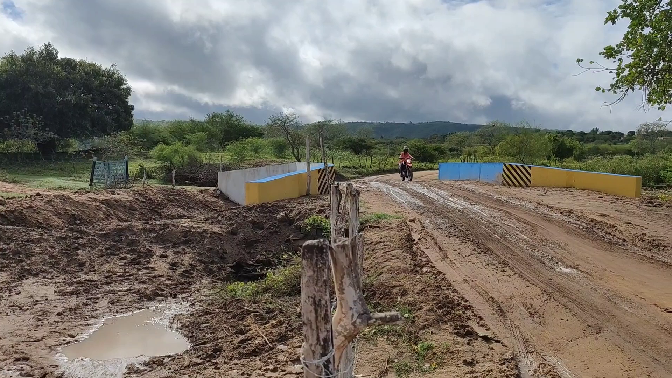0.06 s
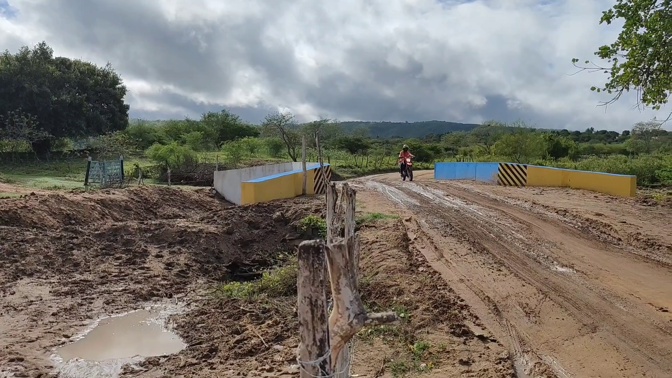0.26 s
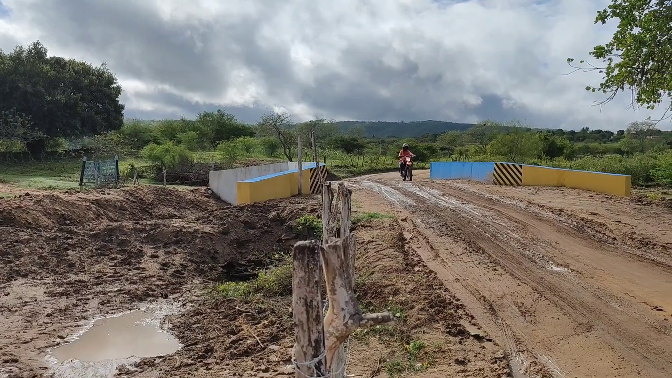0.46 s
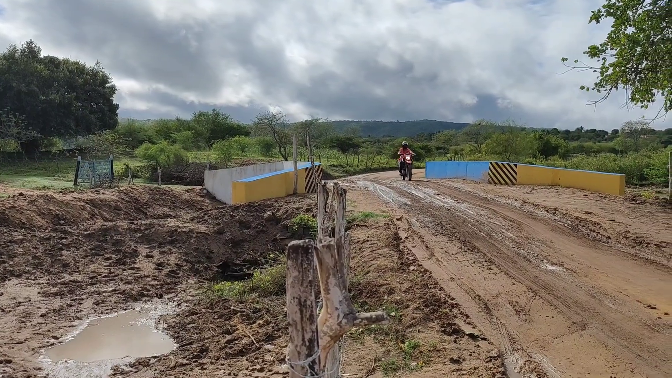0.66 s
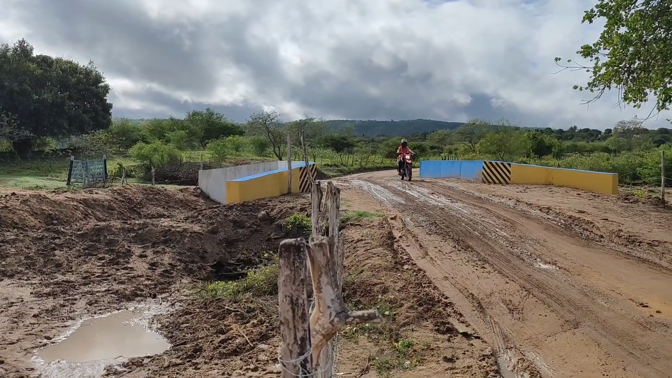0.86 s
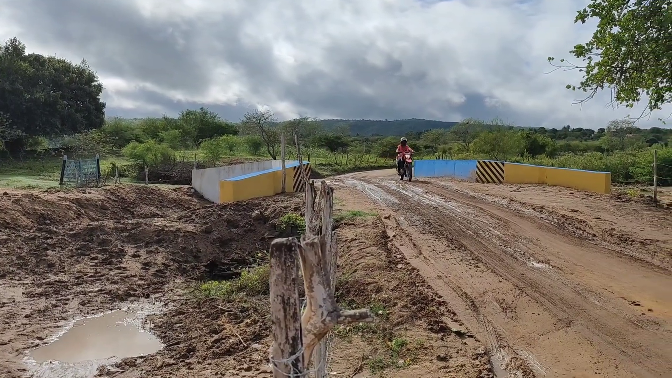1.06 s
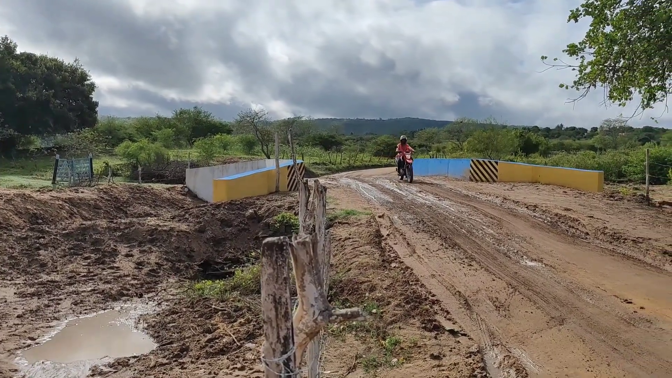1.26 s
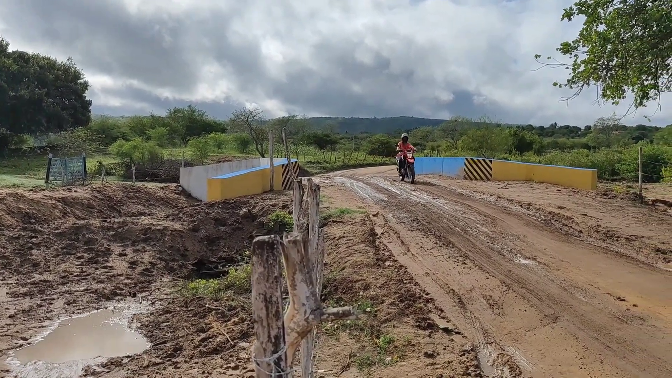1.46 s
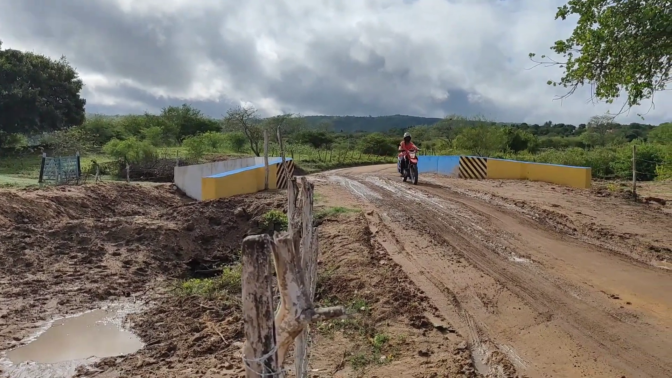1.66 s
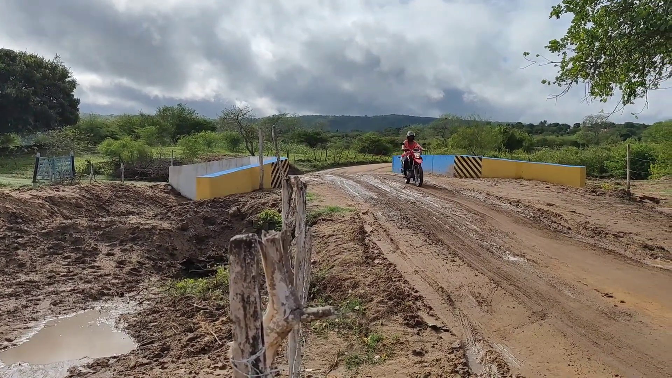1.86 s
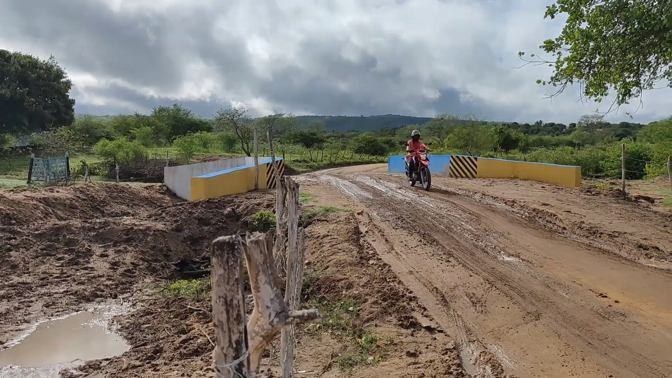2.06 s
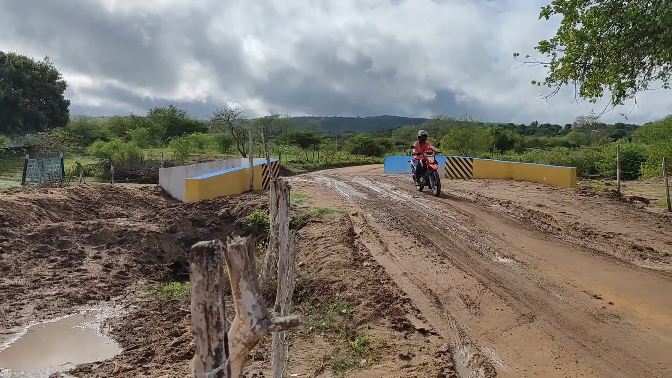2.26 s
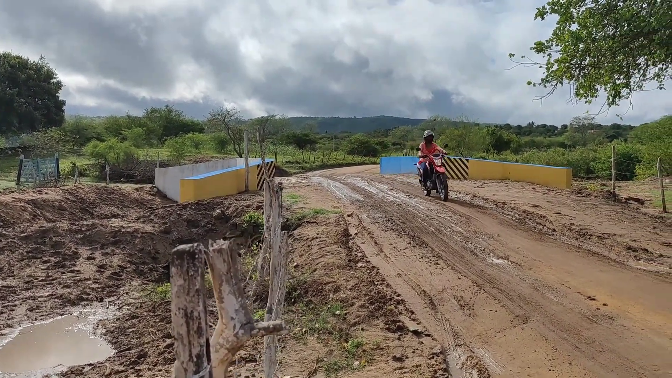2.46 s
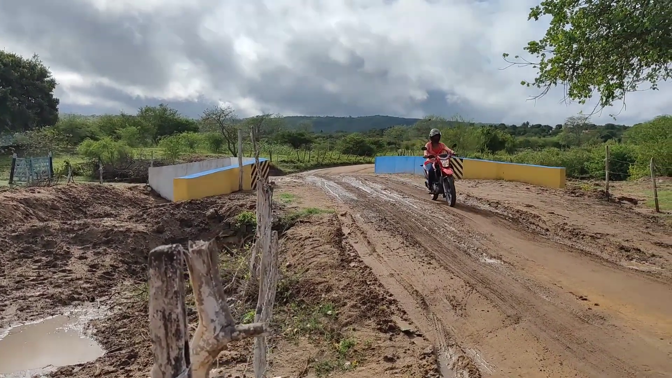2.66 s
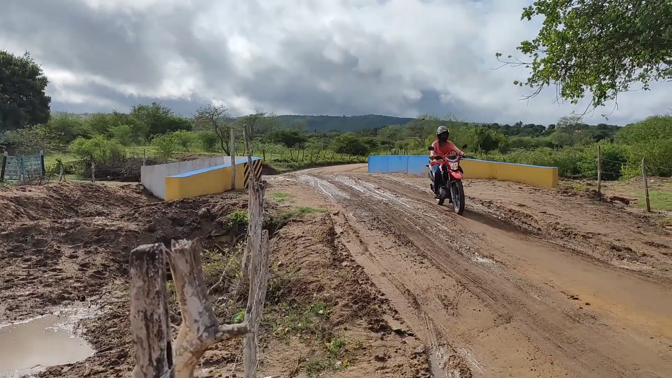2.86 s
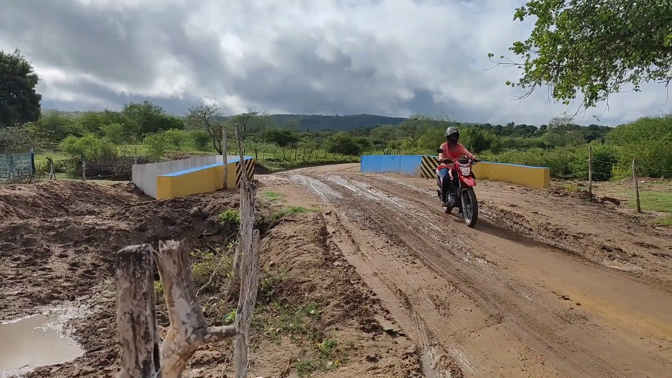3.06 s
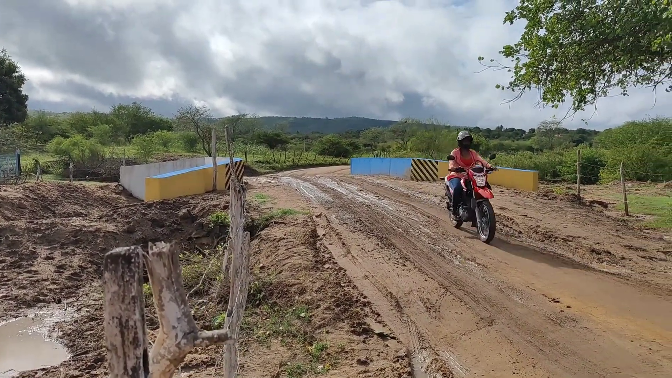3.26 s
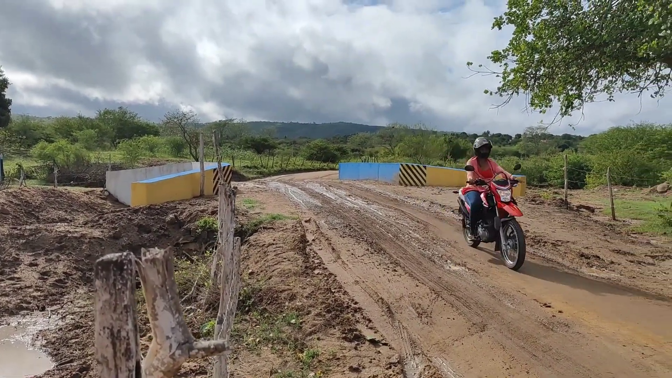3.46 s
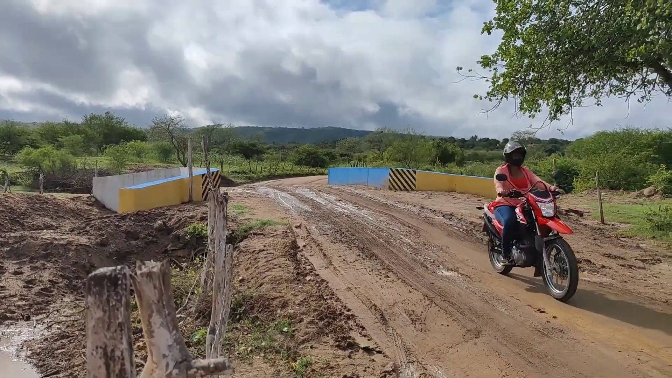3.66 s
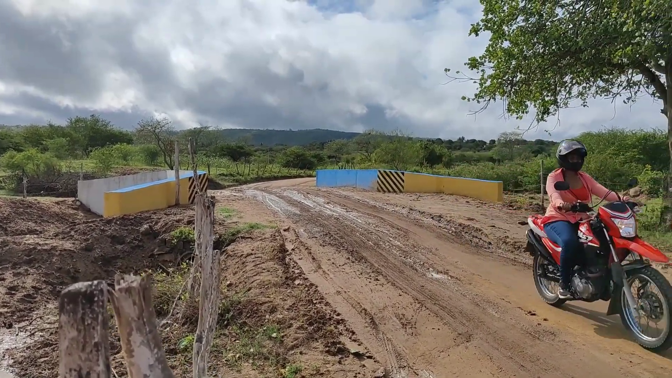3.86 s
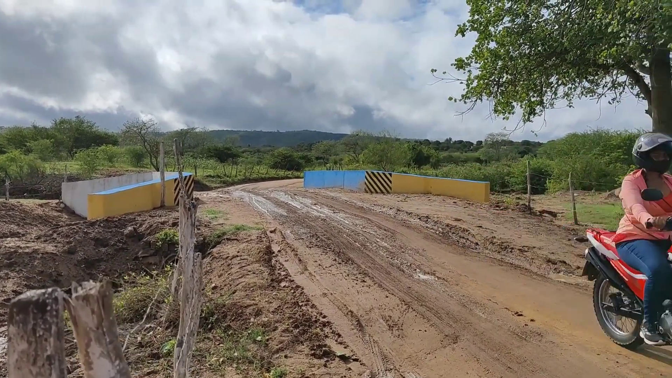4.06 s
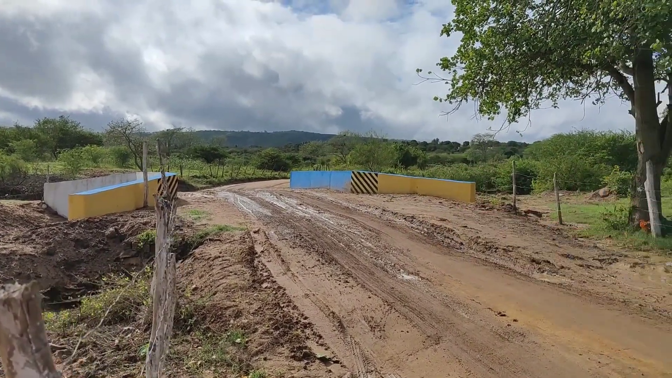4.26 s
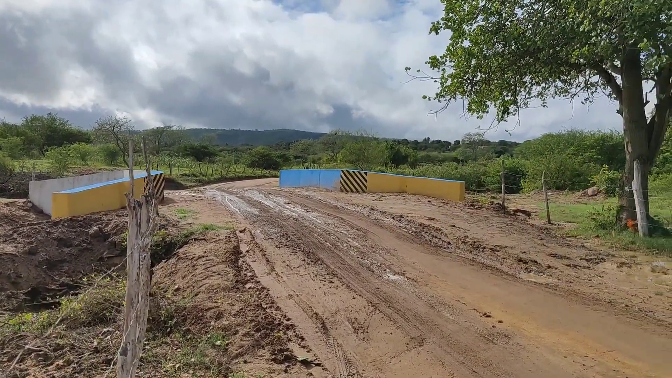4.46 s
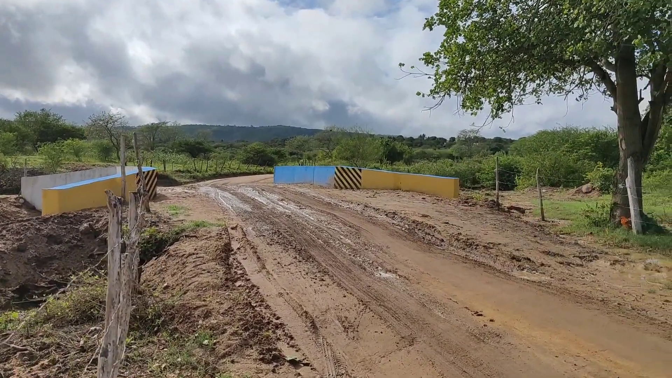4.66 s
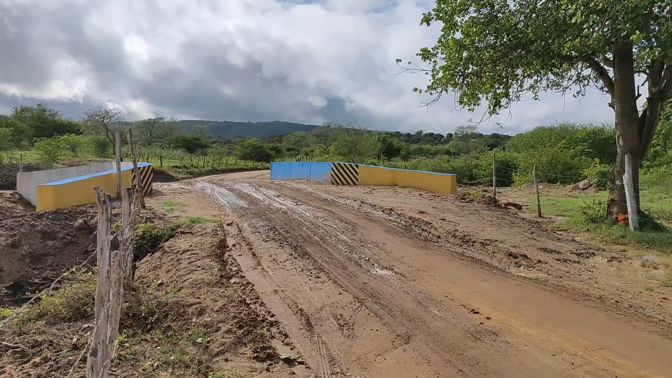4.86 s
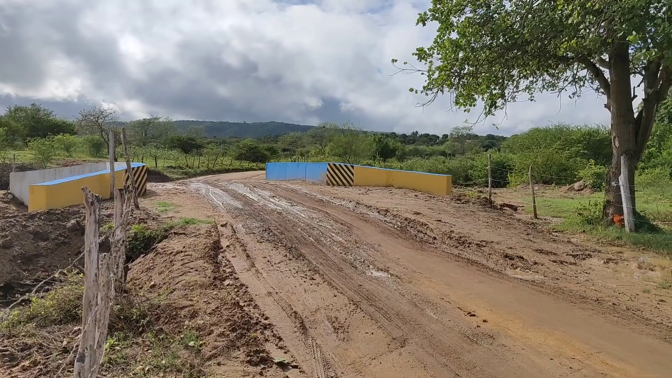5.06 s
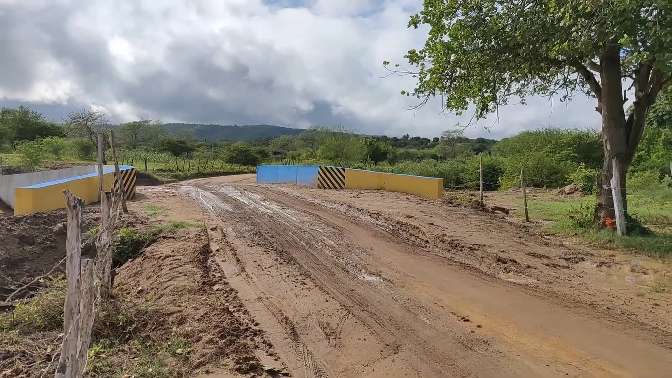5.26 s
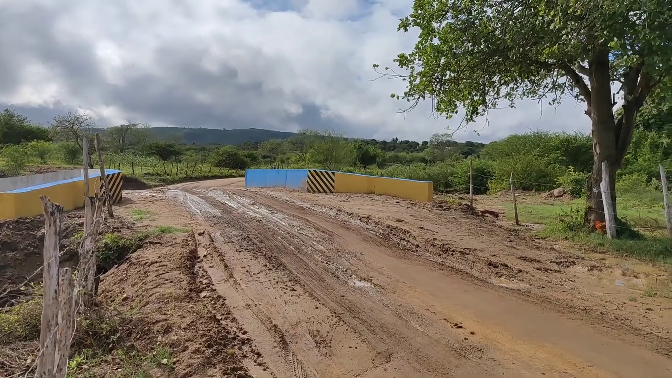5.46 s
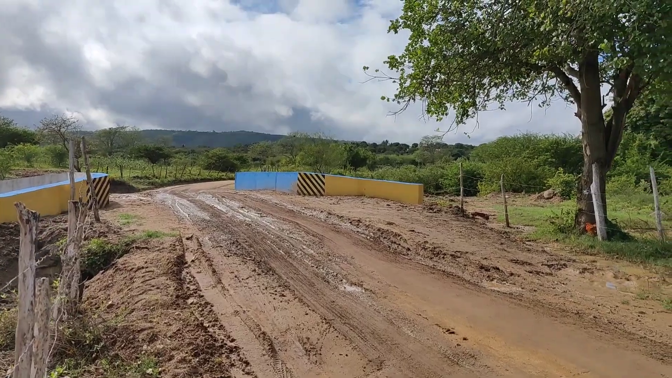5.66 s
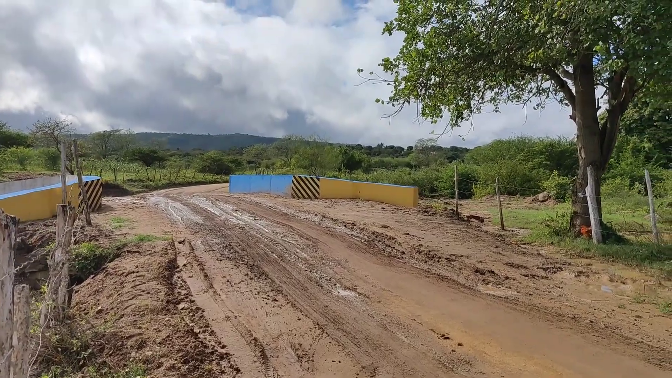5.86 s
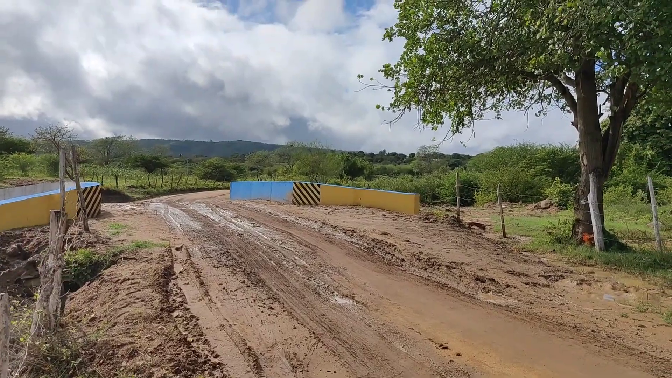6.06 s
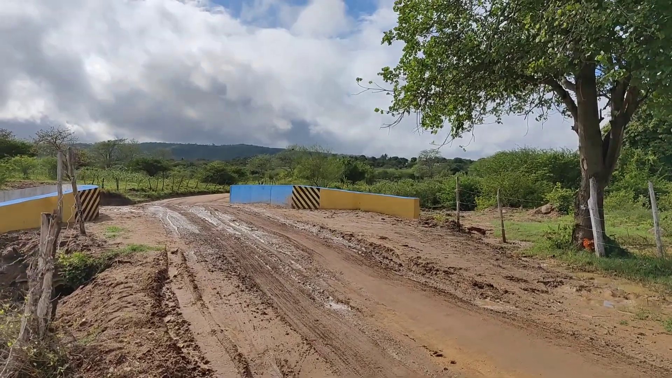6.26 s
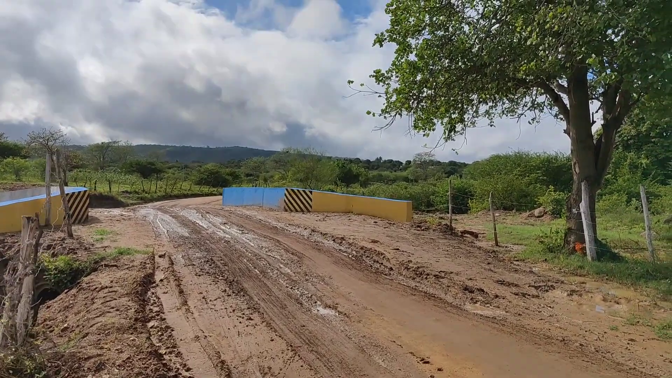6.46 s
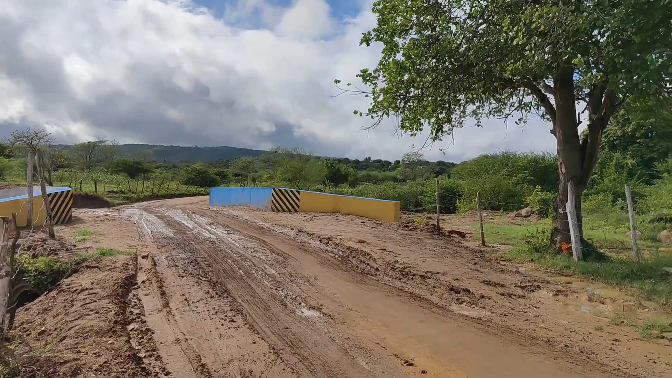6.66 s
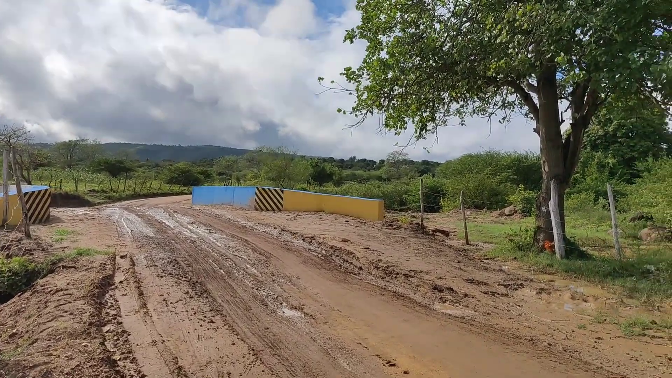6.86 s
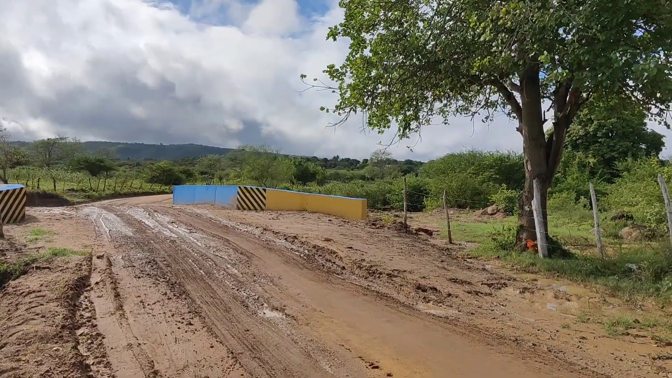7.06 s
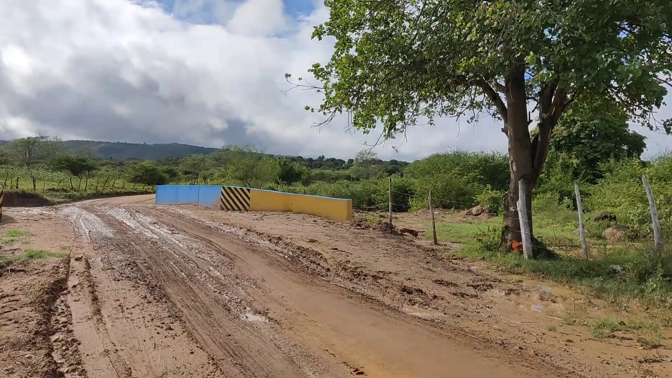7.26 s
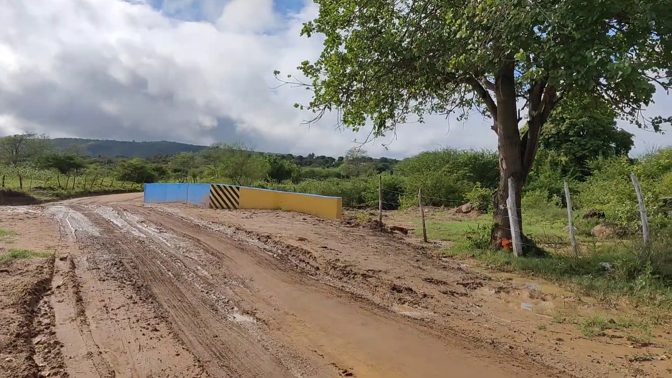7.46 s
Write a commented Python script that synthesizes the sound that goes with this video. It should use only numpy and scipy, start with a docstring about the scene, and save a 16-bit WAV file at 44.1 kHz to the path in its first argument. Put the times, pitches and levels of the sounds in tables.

```python
"""A small four-stroke single rides up a muddy road, eases off before a bump, passes a few metres away and pulls off.
Each firing thumps and rasps in the exhaust; the drive whines, the engine clatters, the tyres spray wet grit.
Most parts follow distance, side shown and throttle; the ground echo sweeps as the bike goes by.
Ruts knock, the suspension squeaks faintly, and wind buffets the two microphone ports near the end."""
import sys
import numpy as np
from scipy import signal
from scipy.fft import rfft, irfft, next_fast_len
from scipy.io import wavfile
from scipy.ndimage import uniform_filter1d, map_coordinates

SR = 44100
rng = np.random.default_rng(int(sys.argv[2]) if len(sys.argv) > 2 else 0)


def to_wav(sig):
    """Store sig (one row per channel, or 1-D mono) as 16-bit WAV at the path in sys.argv[1].

    Samples outside -1..1 are clipped; the rate is SR.
    """
    pcm = np.clip(np.atleast_2d(sig), -1, 1) * 32767
    pcm = np.round(pcm).astype(np.int16)
    wavfile.write(sys.argv[1], SR, pcm.T)  # frames by channels


N = 331411
T = np.arange(N) / SR  # s
# straight ride at steady speed; PASS_S: engine level with the listener
SPEED_M_S, NEAREST_M, PASS_S = 7.19, 2.78, 4.544
# Throughout: cycles = running count of engine cycles (one firing each), cycle_hz = its rate,
# rear = share of sound from the back of the bike. Spectrum levels are relative.


def engine_voice(cycles, cycle_hz, rear, throttle):
    """Low and middle sound: whine beams forward, outlet back and aside, distance smears thump into rumble."""
    # rumble spectrum: f/Hz, level/dB
    rumble_spectrum = [(50, -1), (80, 2), (120, -2), (170, -7.5), (240, -9)]
    # sideways boom of the silencer shell: f/Hz, width/Hz, share factor
    shell_hz, shell_width_hz, shell_share = (77.6, 19, 0.99)
    # late ground echo of the high tailpipe: lag when nearest/ms, share, place ahead of engine/m
    pipe_echo = (1.929, 0.59, -1.53)
    # spectra: f/Hz, level/dB
    airbox_spectrum = [(110, -31), (180, 2), (338, -10.5), (399, -11), (495, -29), (600, -28), (780, -41),
                       (1320, -120)]
    tailpipe_spectrum = [(240, -3.5), (310, -1), (360, 1), (440, -3.5), (520, -5), (600, -6)]
    outlet_spectrum = [(330, -18), (430, 4), (540, -12.5), (613, 1), (690, 5.5), (900, -5.5), (1010, -11),
                       (1150, -15), (1500, -56), (2530, -120)]
    jet_spectrum = [(1550, -13), (1850, -5), (2300, -7), (3000, -20), (4400, -17), (5300, 6), (6200, -22.5)]
    smear_near, smear_m, blur_m = 0.12, 25, 7.2  # blur_m: puffs have lost half their edge
    thump_lead_cycles = 0.045

    metres, _ = position()
    smear = smear_near + (metres / smear_m) ** 2
    rumble = colour(cyclic(cycles, cycle_hz, repeat=0.55), rumble_spectrum)
    pulses = exhaust(cycles + thump_lead_cycles, cycle_hz, throttle, rear)
    shell_gain = shell_share * (beam(aim_deg=103, width_deg=28, db=9.0) - 1)
    pulses = pulses + shell_gain * ring(pulses, shell_hz, shell_width_hz)
    thump = (pulses + smear * rumble) / np.hypot(1, smear) * heard("thump", throttle)

    rasp_gain = heard("rasp", throttle)
    airbox = gas(cycles, cycle_hz, airbox_spectrum, repeat=0.44, depth=0.35, at=-0.106) * rasp_gain
    drive = whine(cycles) * heard("whine", throttle) * beam(aim_deg=0, width_deg=11.6, db=17.5)

    edge = 1 / (1 + (metres / blur_m) ** 2)
    tailpipe = gas(cycles, cycle_hz, tailpipe_spectrum, repeat=0.55, depth=2.6 * edge, at=-0.04)
    tailpipe = steady(tailpipe) * rasp_gain
    outlet_gain = heard("outlet", throttle)
    outlet = steady(gas(cycles, cycle_hz, outlet_spectrum, repeat=0.4, depth=2.6 * edge, at=0.02))
    outlet = outlet * outlet_gain * beam(aim_deg=119, width_deg=33.0, db=9.0)
    # jet hiss in a narrow lobe aslant to the rear
    jet = steady(gas(cycles, cycle_hz, jet_spectrum, repeat=0.4, depth=1.3, at=0.12))
    jet = jet * outlet_gain * undb(-19) * beam(aim_deg=142, width_deg=8.5, db=25)
    crack = bark(cycles) * heard("bark", throttle)

    back = grounded(tailpipe + outlet + crack, *pipe_echo)
    return thump + jet + facing(airbox + drive, back, rear) + boom(cycles) + pull_away_tones(cycles)


def exhaust(cycles, cycle_hz, throttle, rear):
    """Each firing is a pressure dip; under load the pipe echoes it and the intake gulps half a cycle later."""
    # silencer spectra, ahead with little at the firing rate, behind with deep lows: f/Hz, level/dB
    front_spectrum = [(26, -36), (53, -4), (80, 8.5), (106, 8.5), (135, 4.5), (190, 14), (260, 6)]
    rear_spectrum = [(26, 9.5), (53, -0.5), (80, -2), (106, 1.5), (135, 13.5), (160, 11.5), (190, 16),
                     (260, -6)]
    pulse_s, echo_s, intake_s = 0.0017, 0.0076, 0.0029
    scatter_loaded_db, scatter_shut_db = 0.5, 1.2  # firing-to-firing spread

    index = np.round(cycles - 0.25).astype(int)
    scatter_db = scatter_shut_db + (scatter_loaded_db - scatter_shut_db) * throttle
    size, gulp = undb(scatter_db * rng.standard_normal((400, 2))[index].T)
    echo = 0.3 * gate(cycles, echo_s * cycle_hz, pulse_s * cycle_hz)
    intake = 0.85 * gulp * gate(cycles, 0.537, intake_s * cycle_hz)
    # longer, duller dip with the throttle shut
    dip = gate(cycles, 0, pulse_s * cycle_hz * (1 + 0.5 * (1 - throttle) ** 2))
    pulses = -size * (dip + throttle * (echo + intake))
    return steady(facing(colour(pulses, front_spectrum), colour(pulses, rear_spectrum), rear))


def gas(cycles, cycle_hz, spectrum, repeat, depth, at):
    """Gas rushes as coloured noise, swelling in a burst around each firing."""
    burst = 1 + depth * gate(cycles, at, width=0.1)
    return colour(cyclic(cycles, cycle_hz, repeat) * burst, spectrum)


def bark(cycles):
    """The valve cracks open at each firing, the main blast follows, and both ring the tailpipe."""
    # tailpipe resonances: f/Hz, width/Hz, level/dB
    pipe_modes = [(352, 104, -4.5), (423, 40, 6), (636, 37, 0), (694, 94, -12)]
    crack = 0.45 * gate(cycles, at=-0.16, width=0.006) + gate(cycles, at=-0.08, width=0.006)
    crack = crack * undb(1.2 * walk(25))
    rings = sum(undb(db) * ring(crack, hz, width_hz) for hz, width_hz, db in pipe_modes)
    return steady(colour(rings, [(280, 0), (720, 0.0039)]))


def boom(cycles):
    """Deep, round firings that start at once when the throttle first shuts, then die away."""
    # boom spectrum: f/Hz, level/dB
    spectrum = [(40, -10), (80, 4), (115, -1), (200, -19)]
    start_s, attack_s, length_s, level_db = 2.355, 0.0095, 0.39, -44
    age_s = np.maximum(T - start_s, 0)
    pulses = steady(colour(-gate(cycles, at=-0.04, width=0.05), spectrum))
    envelope = (1 - np.exp(-age_s / attack_s)) * np.exp(-(age_s / length_s) ** 2)
    return pulses * undb(level_db) * envelope


def whine(cycles):
    """Teeth mesh 67 times in two cycles; uneven crank speed wavers the tone, and the casing rings near it."""
    # higher gear-case rings, clearest head-on: f/Hz, width/Hz, level/dB
    case_modes = [(1357, 105, -25), (2136, 76, -26.5), (3290, 97, -31), (3860, 140, -28.5)]
    overrun_s, overrun_length_s, overrun_db = 2.54, 0.087, 10.5  # load reverses as the throttle shuts

    angle = 2 * np.pi * 33.5 * cycles + 0.3 * np.sin(2 * np.pi * cycles) + 0.8 * walk(40)
    mesh = np.sin(angle) * undb(3.2 * walk(45))
    mesh = 0.33 * unit(mesh) * beam(aim_deg=0, width_deg=6.5, db=22)
    mesh = mesh * undb(overrun_db * swell(overrun_s, overrun_length_s))
    casing = unit(ring(ring(noise(), hz=806, width_hz=160), hz=682, width_hz=320))
    beats = 1 + 0.64 * gate(cycles, at=0.42, width=0.058) + 0.26 * gate(cycles, at=0.69, width=0.029)
    upper = 0
    for hz, width_hz, db in case_modes:
        upper = upper + undb(db) * unit(ring(ring(noise(), hz, width_hz), hz, width_hz))
    return steady((casing + mesh) * beats) + upper * beats * beam(aim_deg=0, width_deg=20, db=7.5)


def pull_away_tones(cycles):
    """Tone clusters at multiples of the firing rate: upper gear tones and one low exhaust-like hum."""
    # t/s, length/s, multiple of firing rate, relative level/dB, phase wander/rad
    tones = [(4.85, .2, 48, 2, 2.2), (5.7, .3, 48, 2, .6), (5.95, .35, 64, -1.5, 1.8),
             (6.05, .42, 74, -4.5, 2.2), (6.3, .3, 16, 1, .9)]
    out = 0
    for s, length_s, multiple, db, wander_rad in tones:
        tone = 0
        for k in (-1, 0, 1):
            phase = 2 * np.pi * (multiple + k) * cycles + wander_rad * walk(40)
            tone = tone + 0.4 ** abs(k) * np.sin(phase)
        out = out + undb(db) * unit(tone) * swell(s, length_s)
    pulse = 0.2 + gate(cycles, at=0.36, width=0.12)  # once a cycle
    return unit(pulse) * out * undb(-48 + 1.5 * walk(30))


def machinery(cycles, cycle_hz, rear, gains):
    """Bright parts: engine casing and chain struck by ticks, and wet grit thrown by the tyres as noise."""
    # spectra: f/Hz, level/dB
    clatter_front = [(1000, 10.5), (1150, 1.5), (1350, 2.5), (1550, 8), (1950, 2), (2250, 0), (2650, 4),
                     (3400, -1.5), (3900, -4), (4700, -14)]
    clatter_rear = [(1050, -7.5), (1300, 7.5), (1480, 4), (1900, -1), (2400, -1), (3100, -5.5), (3700, -5),
                    (4700, -14.5)]
    chain_front = [(2590, -9), (4050, -5), (4900, -13), (6000, -8), (7890, -7), (9000, -19.5), (11700, -24),
                   (19800, -120)]
    chain_rear = [(2590, -12), (4400, -10.5), (5600, -8), (7900, -6), (9000, -13), (11700, -16.5),
                  (15800, -16)]
    spray_front = [(5000, -2), (6200, 0), (8500, -7.5), (10700, -6), (15100, 0.5), (15800, -7.5)]
    spray_rear = [(5000, -13), (8500, -1.5), (9880, -1), (11600, -9), (15100, -6.5), (15800, -17)]
    # echo shares of clatter, chain, spray: rough mud mirrors clatter, scatters shorter waves
    echo_shares = (.35, .08, 0)

    mach = SPEED_M_S / 343
    front = ticks(cycles, cycle_hz, rear, 1 + mach)
    back = ticks(cycles, cycle_hz, rear, 1 - mach)
    links = ticks(cycles, cycle_hz, rear, 1)
    engine = facing(colour(front, clatter_front), colour(back, clatter_rear), rear)
    chain = facing(colour(links, chain_front), colour(links, chain_rear), rear)
    sprays = [colour(noise() + 1.15 * grit(rate=3900, spread_db=4.5), s) for s in (spray_front, spray_rear)]
    spray = facing(*sprays, rear)
    out = 0
    for part, share, gain in zip((engine, chain, spray), echo_shares, gains):
        out = out + gain * steady(grounded(part, 0.41, share, ahead_m=-1.23))
    return out


def ticks(cycles, cycle_hz, rear, doppler):
    """Metal ticks bunch at valve events in front, exhaust stroke behind; they ring the Doppler-shifted casing."""
    # casing and fin resonances: f/Hz, width/Hz, level/dB
    casing_modes = [(1250, 79, -0.5), (1714, 37, 1), (1927, 110, -1), (2160, 58, 7), (2347, 39, 3),
                    (3096, 77, 1), (3390, 92, -2), (5880, 610, -9.5)]
    front_depth, rear_depth, blur_m = 1.15, 0.62, 13
    metres, _ = position()
    valves = gate(cycles, at=0.69, width=0.04) + 0.65 * gate(cycles, at=0.86, width=0.05)
    valves = front_depth * valves / (1 + (metres / blur_m) ** 2)
    stroke = rear_depth * gate(cycles, at=0.11, width=0.17)
    chatter = cyclic(cycles, cycle_hz, repeat=0.55) + 0.5 * grit(rate=1300, spread_db=2.2)
    blows = chatter * (1 + (1 - 0.5 * rear) * valves + rear * stroke)
    rings = sum(undb(db) * ring(blows, hz * doppler, width_hz) for hz, width_hz, db in casing_modes)
    return blows + (1 - 0.64 * rear) * rings


def head_ring(cycles, cycle_hz, throttle):
    """Cylinder head rings at valve events and firing, heard as the front quarter turns to the listener."""
    # head resonances: f/Hz, width/Hz, level/dB
    head_modes = [(1924, 125, -17), (2172, 280, -16.5), (3167, 560, -17)]
    valves = gate(cycles, at=0.72, width=0.05) + 0.7 * gate(cycles, at=0.86, width=0.05)
    blows = 0.45 + valves + 0.7 * gate(cycles, at=0.17, width=0.1)
    knock = cyclic(cycles, cycle_hz, repeat=0.65) * blows
    rings = 0
    for hz, width_hz, db in head_modes:
        rings = rings + undb(db) * unit(ring(ring(knock, hz, width_hz), hz, width_hz))
    return rings * heard("clatter", throttle) * beam(aim_deg=34, width_deg=19.5, db=18)


def knocks():
    """A rut thuds through the frame and shakes loose parts: decaying bursts of resonant noise."""
    # t/s (onset 12 ms earlier), decay/s, thud level/dB, rattle level/dB, rattle f/Hz, rattle width/Hz
    ruts = [(1.87, 0.032, -42.5, -43.5, 5070, 4000), (2.158, 0.023, -35.5, -41.5, 6500, 4000),
            (3.003, 0.024, -36.5, -36, 2280, 2010), (4.113, 0.0064, -53.5, -33.5, 3260, 690),
            (4.243, 0.012, -59, -36.5, 3550, 260), (4.278, 0.012, -59, -32, 3480, 260),
            (4.35, 0.012, -59, -37.5, 3400, 300), (4.48, 0.015, -54, -23.5, 2980, 250),
            (4.552, 0.0057, -51, -19.5, 3200, 4000), (5.868, 0.011, -51, -37, 410, 130),
            (6.215, 0.013, -38, -51.5, 8000, 9000), (6.985, 0.02, -49, -47.5, 5000, 4200)]
    out = np.zeros((2, N))
    thud = unit(ring(ring(noise(), hz=153, width_hz=160), hz=160, width_hz=170))
    shake = np.array([noise() + grit(rate=900, spread_db=3.0) for _ in range(2)])
    for s, decay_s, thud_db, rattle_db, hz, width_hz in ruts:
        age = np.maximum(T - s + 0.012, 0) / decay_s
        envelope = 2 * np.sqrt(age) * np.exp(-age)
        rattle = unit(ring(ring(shake, hz, width_hz), hz, 2 * width_hz))
        out += envelope * (undb(thud_db) * thud + undb(rattle_db) * rattle)
    return out


def squeak():
    """Faint, breathy suspension squeak after the last rut: narrow-band noise."""
    hz, width_hz = 1720, 160
    rub = unit(ring(ring(noise(), hz, width_hz), hz, 3 * width_hz))
    return undb(-57) * swell(7.1, 0.065) * rub


def outdoors():
    """Faint open-country air, a low breeze, and short gusts that hit the two ports unequally."""
    # spectra: f/Hz, level/dB
    air_spectrum = [(25, -7), (55, -1.5), (130, -20.5), (280, -16.5), (430, -22), (700, -13), (1200, -25),
                    (2200, -23), (7000, -35.5), (15800, -37.5)]
    wind_spectrum = [(20, -13), (45, -14), (90, -14.5), (160, -17.5), (260, -34.5), (600, -91)]
    # t/s, length/s, level/dB, left minus right/dB
    gusts = [(6.232, 0.016, -35.5, -22), (6.407, 0.072, -34.5, -1), (6.55, 0.0215, -41.5, 22),
             (6.633, 0.0366, -23.5, 6.5), (7.287, 0.011, -35, 4.5), (7.332, 0.011, -34.5, -19)]
    air = colour(noise() + 3.56 * np.array([noise(), noise()]), air_spectrum) * undb(-51 + walk(0.91))
    force = undb(-59 + 2 * walk(6))
    for s, length_s, db, pan_db in gusts:
        force = force + undb(db + np.array([[pan_db], [-pan_db]]) / 2) * swell(s, length_s)
    return air + force * colour(noise() + 2.6 * np.array([noise(), noise()]), wind_spectrum)


def position(ahead_m=0):
    """Distance/m of a point on the bike, and the angle it is seen from/deg (0 head-on, 180 from behind)."""
    along_m = SPEED_M_S * (T - PASS_S) + ahead_m
    return np.hypot(along_m, NEAREST_M), np.degrees(np.arctan2(NEAREST_M, -along_m))


def heard(part, throttle):
    """Gain of a part: 1/distance, with throttle and the side turned to the listener."""
    # part: place ahead of engine/m, full-throttle level at 1 m from ahead/dB, from the side/dB,
    # from behind/dB, change with throttle shut/dB; before beams and mix gains
    radiation = {"thump": (-0.5, -17, -18, -12, -5.5), "rasp": (1.5, -22, -26, -19.5, -10),
                 "bark": (-1.5, -47, -29, -33, -5.5), "whine": (1, -28, -24, -22.5, -9),
                 "outlet": (3.5, -44.5, -37.5, -23.5, -7.5), "clatter": (-0.75, -24, -21.5, -29.5, -11.5),
                 "chain": (-0.54, -26, -24, -34, -5.5), "spray": (-0.7, -30, -31.5, -55, -1)}
    ahead_m, front_db, side_db, back_db, shut_db = radiation[part]
    metres, angle_deg = position(ahead_m)
    head_on = np.cos(np.radians(angle_deg))
    tilt_db = head_on * (front_db - back_db) / 2
    bulge_db = head_on ** 2 * ((front_db + back_db) / 2 - side_db)
    return undb(side_db + tilt_db + bulge_db + shut_db * (1 - throttle)) / metres


def beam(aim_deg, width_deg, db):
    """Extra gain while a narrow lobe of sound points at the listener."""
    _, angle_deg = position()
    return undb(db * np.exp(-((angle_deg - aim_deg) / width_deg) ** 2))


def rear_view():
    """Share of sound from the back of the bike; swings over as the bike draws level."""
    turn_deg, over_deg, least, most = 62, 13, 0.09, 0.88
    _, angle_deg = position()
    return least + (most - least) * (1 + np.tanh((angle_deg - turn_deg) / over_deg)) / 2


def facing(front, back, rear):
    """Power blend of forward and backward radiation."""
    return np.sqrt(1 - rear) * front + np.sqrt(rear) * back


def grounded(x, lag_ms, share, ahead_m):
    """Add the ground echo, whose extra path is longest when the bike is nearest."""
    metres, _ = position(ahead_m)
    return x + share * delay(x, lag_ms * NEAREST_M / metres)


def soft_ground(x):
    """Far sound skimming soft ground loses its low middle, on the approach side only."""
    half_m = 19
    metres, angle_deg = position()
    loss = 0.6 * (angle_deg < 90) * metres ** 4 / (metres ** 4 + half_m ** 4)
    return x - loss * ring(x, hz=400, width_hz=230)


def gate(cycles, at, width):
    """A Gaussian bump once an engine cycle; at and width in cycles."""
    return np.exp(-0.5 * (((cycles - at + 0.5) % 1 - 0.5) / width) ** 2)


def cyclic(cycles, cycle_hz, repeat):
    """Noise of which a power share comes back alike in every engine cycle."""
    age = ((cycles + 0.25) % 1 / cycle_hz * SR).astype(int)  # samples into the cycle
    return np.sqrt(repeat) * noise()[age] + np.sqrt(1 - repeat) * noise()


def grit(rate, spread_db):
    """Random tiny clicks at a mean rate per second, a few much larger than the rest; rms 1."""
    hits = (rng.random(N) < rate / SR) * noise()
    return unit(hits * undb(spread_db * np.minimum(rng.exponential(size=N), 4)))


def noise():
    """White noise."""
    return rng.standard_normal(N)


def walk(rate):
    """Random drift, rms 1, through rate knots per second joined by straight lines."""
    knots = rng.standard_normal(4096)
    return unit(map_coordinates(knots, [T * rate], order=1, mode="wrap"))


def swell(s, length_s):
    """A Gaussian rise and fall around a moment, top 1."""
    return np.exp(-0.5 * ((T - s) / length_s) ** 2)


def curves(rows):
    """Each column of a table, joined by straight lines in time."""
    s, *columns = np.transpose(rows)
    return [np.interp(T, s, c) for c in columns]


def colour(x, points):
    """Filter x by (f/Hz, level/dB) points on a log-f axis, 60 dB/octave skirts outside; rms 1."""
    size = next_fast_len(N)
    octave = np.log2(np.maximum(np.fft.rfftfreq(size, 1 / SR), 1))
    hz, db = np.transpose(points)
    edge = np.log2(hz)
    outside = np.abs(octave - np.clip(octave, edge[0], edge[-1]))
    gain = undb(np.interp(octave, edge, db) - 60 * outside)
    return unit(irfft(rfft(x, size) * gain, size)[..., :N])


def ring(x, hz, width_hz):
    """One resonance, gain 1 at its centre."""
    return signal.lfilter(*signal.iirpeak(hz, hz / width_hz, fs=SR), x)


def delay(x, ms):
    """Read x a moving number of milliseconds late."""
    return map_coordinates(x, [np.arange(N) - ms * SR / 1000], order=3)


def steady(x):
    """Hold the rms over 0.25 s at 1."""
    return x / np.sqrt(uniform_filter1d(x ** 2, SR // 4))


def unit(x):
    """Scale to rms 1."""
    return x / np.sqrt(np.mean(x ** 2))


def undb(db):
    """Decibels to gain."""
    return 10 ** (np.asarray(db) / 20)


def scene():
    """The bike's parts, heard directly and scattered by the verges, over knocks, squeak and wind."""
    # engine speed as heard: t/s, firing rate/Hz
    revs = [(0.0, 23.71), (0.3, 23.47), (0.8, 24.82), (1.05, 24.09), (1.3, 24.85), (1.43, 24.2),
            (1.59, 27.15), (1.8, 26.76), (2.3, 27.47), (2.55, 22.86), (2.78, 19.26), (2.92, 23.5),
            (3.15, 21.36), (3.7, 23.77), (4.15, 24.84), (4.5, 26.72), (4.8, 25.77), (5.15, 26.91),
            (6.0, 28.61), (6.65, 30.56), (7.51, 30.33)]
    # t/s, opening 0-1
    openings = [(0, 0.73), (1.1, 0.75), (1.9, 0.94), (2.25, 0.78), (2.42, 0.6), (2.8, 0.1), (2.95, 0.76),
                (3.25, 0.61), (4.2, 0.98), (4.7, 1), (5.35, 0.9), (5.9, 1), (6.55, 0.66), (6.8, 0.29),
                (7.15, 0.48), (7.5, 0.04)]
    # bike at the two ports: t/s, lag of left port/ms, treble left minus right/dB
    bearing = [(0, 0.03, -4), (2.5, 0.062, -4), (3.7, 0.08, -3), (4.2, 0.26, -4), (4.55, 0.47, -4.5),
               (5.2, 0.29, -2), (5.8, 0.23, 0), (7.5, 0.22, -6.5)]
    # wet, rough stretches: t/s, length/s, rise/dB
    mud = [(1.66, 0.066, 3), (2.25, 0.57, 3.5), (4.555, 0.092, 1), (6.05, 0.19, 1)]
    # share of that rise reaching clatter, chain, spray
    mud_shares = (0.24, 1, 1)

    cycle_hz, = curves(revs)
    cycles = np.cumsum(cycle_hz) / SR
    throttle, = curves(openings)
    lag_ms, pan_db = curves(bearing)
    rear = rear_view()
    low = soft_ground(engine_voice(cycles, cycle_hz, rear, throttle))

    mud_db = sum(db * swell(s, length_s) for s, length_s, db in mud)
    gains = []
    for part, share in zip(("clatter", "chain", "spray"), mud_shares):
        gains.append(heard(part, throttle) * undb(share * mud_db))
    direct, *scattered = (machinery(cycles, cycle_hz, rear, gains) for _ in range(3))
    # longer waves reach both ports alike
    direct = direct + 0.52 * ring(direct, hz=2000, width_hz=5300) + 2 * head_ring(cycles, cycle_hz, throttle)
    scattered = np.array([p - 0.6 * ring(p, hz=1350, width_hz=1100) for p in scattered])
    treble = undb(-6.5) * np.array([delay(direct, lag_ms), direct]) + undb(2.5) * scattered
    treble = treble * undb(0.75 * walk(28))  # flutter from uneven mud
    bike = np.array([delay(low, lag_ms), low]) + treble * undb(np.array([pan_db, -pan_db]) / 2)
    return bike + knocks() + squeak() + outdoors()


def record(dry):
    """The microphone cuts the top: steep low-pass at 15.85 kHz."""
    return signal.sosfilt(signal.ellip(10, 0.2, 80, 15850, fs=SR, output="sos"), dry)


dry = scene()
out = record(dry)
to_wav(out)
```